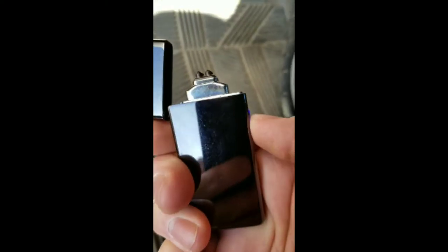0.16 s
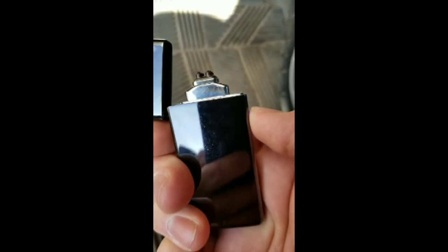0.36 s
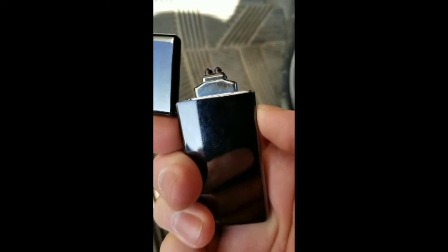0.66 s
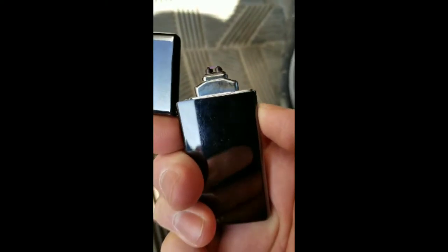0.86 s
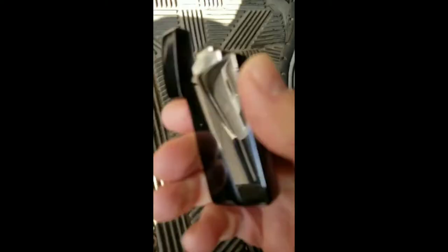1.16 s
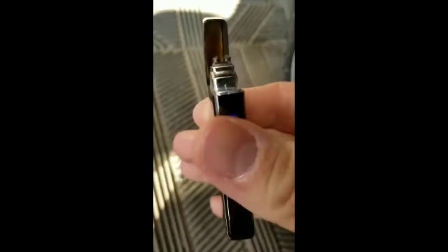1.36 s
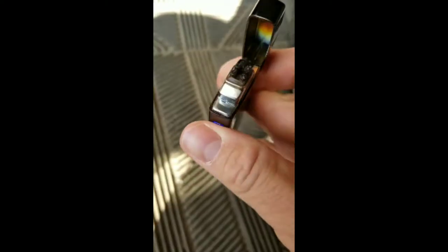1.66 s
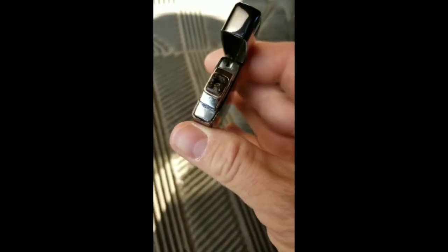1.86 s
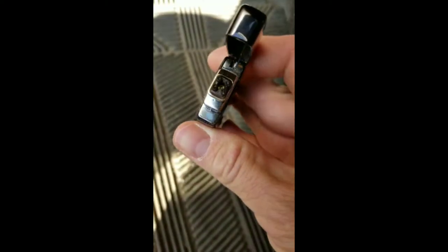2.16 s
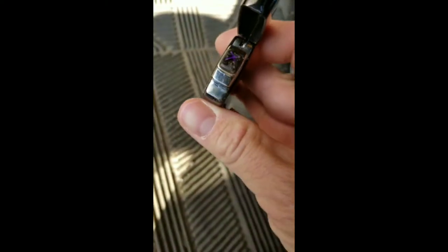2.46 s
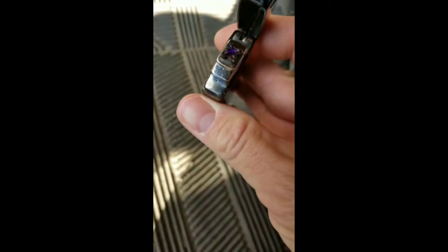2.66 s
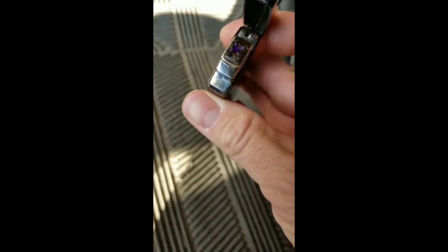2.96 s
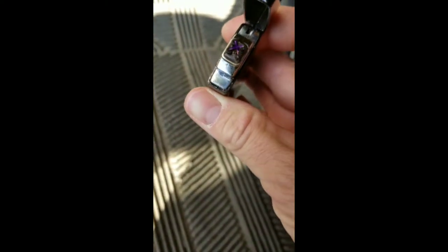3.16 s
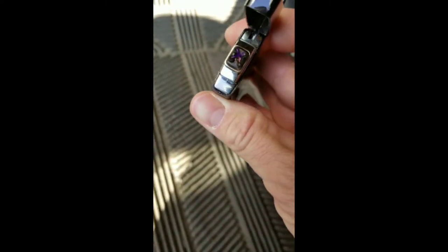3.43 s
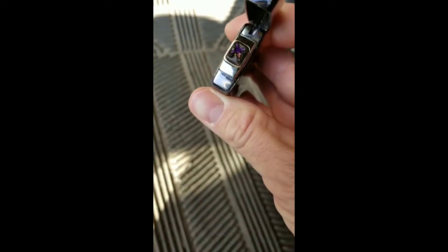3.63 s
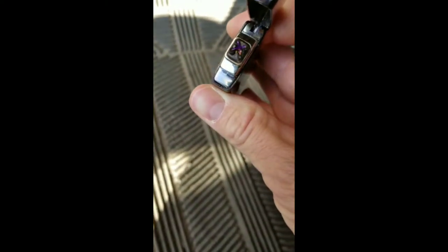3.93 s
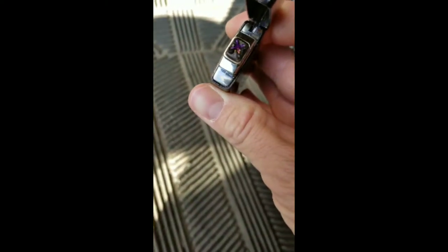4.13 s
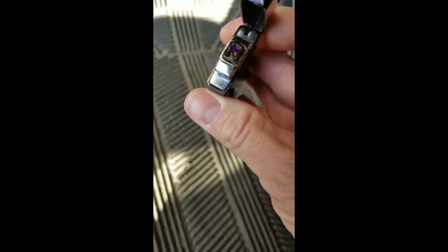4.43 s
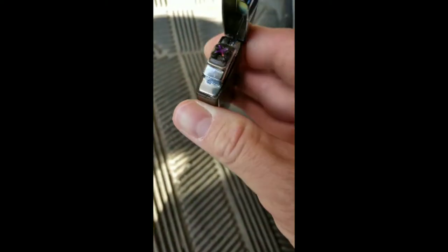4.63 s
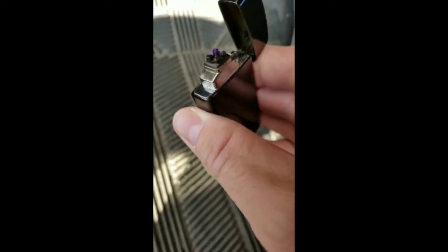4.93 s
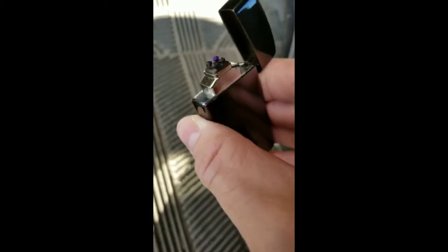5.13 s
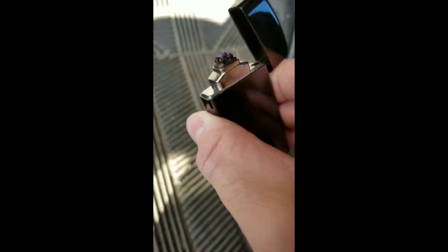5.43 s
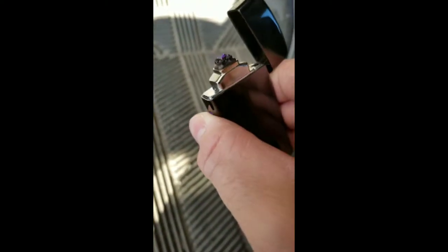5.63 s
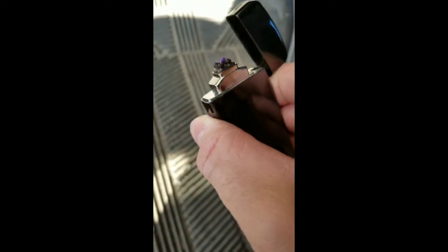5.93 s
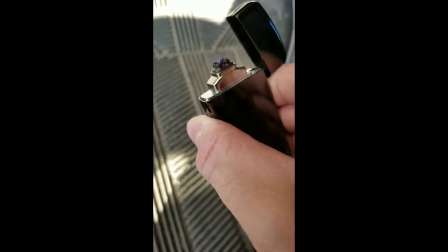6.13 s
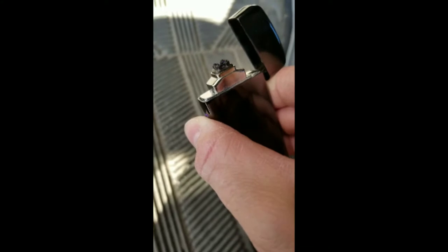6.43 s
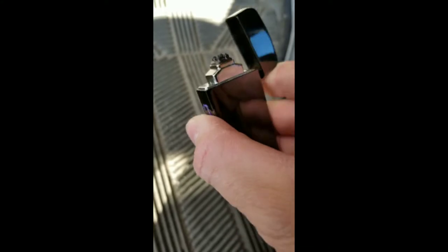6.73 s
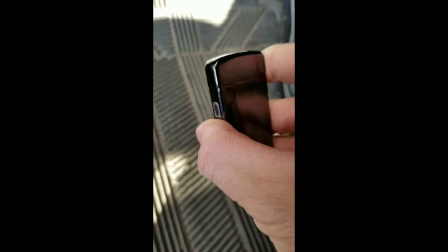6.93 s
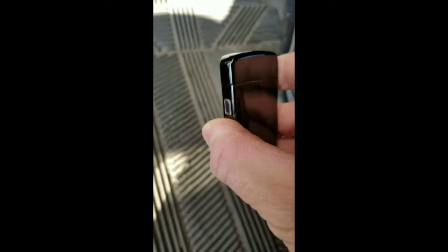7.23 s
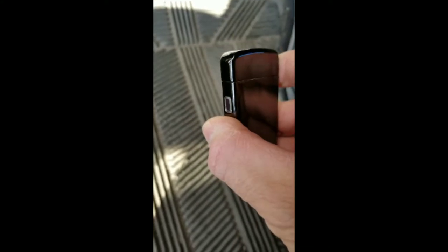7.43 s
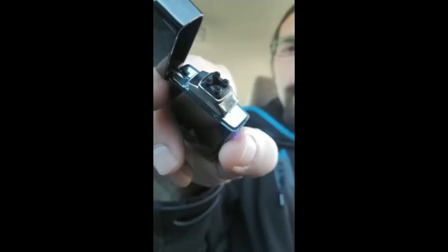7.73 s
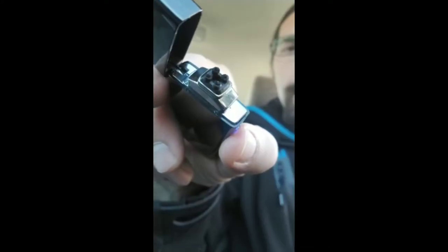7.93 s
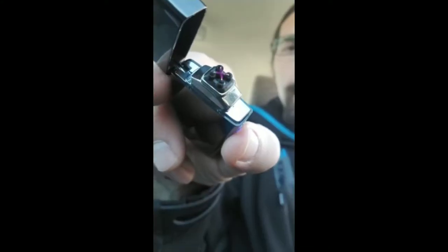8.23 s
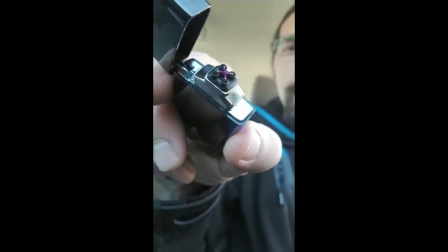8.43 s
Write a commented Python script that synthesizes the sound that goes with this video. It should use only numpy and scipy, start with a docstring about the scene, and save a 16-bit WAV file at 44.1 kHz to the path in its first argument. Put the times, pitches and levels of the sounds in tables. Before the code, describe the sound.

An electric arc lighter snaps and hisses in bright fizzing bursts inside an idling car; its metal lid clacks shut, then another burn starts after silence.

```python
"""An electric arc lighter is fired three times, close to a phone, in a parked car with the engine idling.
A click of the case precedes each burn, which starts with a snap and hisses as a stream of tiny discharges;
the first two end with a pop and fingers rub the case. The sound starts to fade just before the metal lid
clacks shut, ringing in damped modes, then scrapes on the rim. After a brief silence it comes back, with
the phone turned round and the engine and hiss weaker; the last burn is still hissing at the end."""
import sys
import numpy as np
from scipy import signal
from scipy.fft import rfft, irfft
from scipy.io import wavfile
from scipy.ndimage import uniform_filter1d

SR = 44100
rng = np.random.default_rng(int(sys.argv[2]) if len(sys.argv) > 2 else 0)


def put_to_file(sound):
    """Save the sound as 16-bit audio at rate SR, in the file named by the first command-line argument."""
    columns = np.atleast_2d(sound).T  # one column per channel
    safe = np.clip(columns, -1, 1)
    whole_steps = np.round(safe * 32767)
    wavfile.write(sys.argv[1], SR, whole_steps.astype(np.int16))


N = 378785
T = np.arange(N) / SR
BREAK_S = 7.6  # within the silence: the balance of the sources and the cabin colour switch here


def undb(db):
    """Logarithmic level: decibels to linear amplitude gain."""
    return 10 ** (np.asarray(db) / 20)


def curve(rows):
    """Linear interpolation: each column of a table as a line through time."""
    s, *columns = np.transpose(rows)
    return [np.interp(T, s, c) for c in columns]


def unit(x):
    """Power normalisation: scale so that the mean of the channels has rms 1."""
    return x / np.std(np.atleast_2d(x).mean(axis=0))


def pan(db):
    """Interaural level difference: left and right gains, split evenly in dB."""
    return undb(np.array([[1], [-1]]) * db / 2)


def colour(x, points):
    """Minimum-phase filtering: a causal response whose gain follows (hz, db) points."""
    size = 16384
    hz, db = np.transpose(points)
    bins_hz = np.fft.rfftfreq(size, 1 / SR)
    gain_db = np.interp(np.log(bins_hz + 1), np.log(hz), db)
    # folding the cepstrum onto positive time makes the filter causal
    cepstrum = irfft(np.log(undb(gain_db)))[:size // 2]
    cepstrum[1:] *= 2
    response = irfft(np.exp(rfft(cepstrum, size)))[:size // 2]
    filtered = signal.fftconvolve(np.atleast_2d(x), response[None], axes=1)
    return filtered[:, :x.shape[-1]].reshape(x.shape)


def band(x, hz, width):
    """Simple resonance: a second-order peak of given width in Hz, gain 1 at its centre."""
    return signal.lfilter(*signal.iirpeak(hz, hz / width, fs=SR), x)


def top_cut(x):
    """Band limitation: a steep elliptic low-pass at the top of the audible band."""
    return signal.sosfilt(signal.ellip(12, .2, 80, 15550, fs=SR, output="sos"), x)


def walk(rate):
    """Slow random modulation: levels held 1 / rate s and slewed twice; spread near 1."""
    k = max(int(SR / rate), 1)
    held = np.repeat(rng.standard_normal(N // k + 1), k)
    return 1.3 * uniform_filter1d(uniform_filter1d(held, k), k)[:N]


def ring(t60):
    """Free decay: a quarter second of exponential, falling 60 dB in t60 seconds."""
    return np.exp(-np.log(1000) * T[:SR // 4] / t60)


def burst(t60):
    """Broadband impact: exponentially dying noise, independent at each port."""
    return rng.standard_normal((2, SR // 4)) * ring(t60)


def add(out, s, x, db):
    """Superposition: mix a short sound in at s seconds, its channel mean peaking at the given level."""
    i = int(s * SR)
    scaled = x * undb(db) / np.abs(x.mean(axis=0)).max()
    out[:, i:i + x.shape[1]] += scaled[:, :N - i]


def engine(wander=0.0091, uneven=.07, later_db=-7):
    """Harmonic series: the idle drones at multiples of the firing rate; higher ones waver more."""
    # harmonics of the idle: multiple, level_db (rms before the break)
    harmonics = [(1, -48.5), (2, -52), (3, -48.5), (4, -51), (5, -51), (6, -61.5), (9, -57), (10, -69)]
    idle_hz = 24.18  # mean firings per second
    turns = np.cumsum(idle_hz * (1 + wander * walk(2))) / SR
    drone = 0
    for multiple, db in harmonics:
        waver = 1 + min(uneven * multiple, .6) * walk(12)
        drone = drone + undb(db) * waver * np.sin(2 * np.pi * (multiple * turns + rng.random()))
    return np.sqrt(2) * drone * undb(later_db * (T > BREAK_S))


def cabin(spectrum, db, swell_db=0.9):
    """Room resonance: rumble and moving air lifted by cabin modes; the bass is alike at both ports."""
    # difference between the ports: hz, side_minus_mid_db
    side_colour = [(60, -15.5), (130, -20.5), (260, -10.5), (500, -5), (1100, -1), (2500, -1), (12000, -1)]
    # resonances of the cabin: centre_hz, width_hz, lift_db
    resonances = [(111, 20, 4), (465.6, 45, 4.5), (516, 28, 3), (622, 24, 2)]
    mid, side = rng.standard_normal((2, N))
    air = colour(mid + np.array([[1], [-1]]) * colour(side, side_colour), spectrum)
    air = air + sum((undb(lift_db) - 1) * band(air, hz, width) for hz, width, lift_db in resonances)
    boom = band(air, 100, 120)
    swell = undb(swell_db * walk(7.8)) - 1
    return unit(air + boom * swell) * undb(db)


def strokes():
    """Contact pressure: each stroke rises, holds and dies away over the resting grip."""
    # strokes of skin on the case: start_s, length_s, level_db (relative)
    rubs = [(1.108, 0.13, -57.5), (1.27, 0.24, -66.5), (1.453, 0.38, -67), (6.244, .03, -61),
            (7.003, 0.029, -50.5), (7.123, 0.45, -60)]
    attack_s, release_s = 0.04, 0.054
    pressure = undb(-77.5)  # the holding hand never quite rests
    for s, length, db in rubs:
        attack = np.clip((T - s) / attack_s, 0, 1)
        release = np.exp(-np.maximum(T - s - length, 0) / release_s)
        pressure = np.hypot(pressure, undb(db) * attack * release)
    return pressure


def fingers(grain_db=1.0, catch_db=0.9, later_db=-6):
    """Stick-slip friction: skin slides over the polished case in fine grains, catching unevenly."""
    # colour of the rubbing: hz, gain_db
    rub_colour = [(800, -5.5), (2000, 3), (3300, 3.5), (4300, -3), (6000, -1), (8000, -3), (11000, -1.5),
                  (15000, -5)]
    grains = rng.standard_normal((2, N)) * undb(grain_db * walk(300) + catch_db * walk(25))
    return unit(colour(grains, rub_colour)) * strokes() * undb(later_db * (T > BREAK_S))


def ticks(width_hz=600):
    """Impact excitation: a click of button or case is a dry crack and one damped resonance."""
    # clicks: start_s, peak_db (before the fade), ring_hz, t60_s, left_minus_right_db, crack_gain_db
    clicks = [(.4148, -32.5, 4400, .026, 0, -13), (2.476, -53.5, 3000, .04, 0, -6),
              (7.1572, -24.5, 13000, .003, 14, -4), (8.072, -48.5, 5000, .06, 0, -16)]
    out = np.zeros((2, N))
    for s, db, hz, t60, pan_db, crack_db in clicks:
        crack = signal.lfilter(*signal.butter(1, hz, fs=SR), burst(t60 / 2))
        resonance = band(burst(t60), hz, width_hz)
        add(out, s, (resonance + undb(crack_db) * crack) * pan(pan_db), db)
    return out


def spits(per_second=35, lift=0.59, t60=0.0044):
    """Arc instability: now and then the plasma thread jumps and the discharges flare for a moment."""
    jumps = (rng.random(N) < per_second / SR) * rng.exponential(size=N)
    return 1 + lift * signal.fftconvolve(np.minimum(jumps, 2), ring(t60))[:N]


def scatter(t60, evenness=0.032):
    """Multipath scattering: very short reflections smear a click, its overall colour nearly kept."""
    paths = rfft(rng.standard_normal(SR // 4) * ring(t60))
    power = np.abs(paths) ** 2
    whitened = irfft(paths / np.sqrt(power + evenness * power.mean()))
    lead = 64  # samples kept ahead of the main arrival
    return np.roll(whitened, lead)[:SR // 40]


def at_ports(x, t60=(.003, .022), shifting_db=(-14, -1), shifts_per_s=24, lag_s=.0004, count=8):
    """Direct and reflected paths: the left port hears the arc almost directly, the right off hand and lid."""
    def heard(smear):
        return signal.fftconvolve(x, scatter(smear))[:N]

    # the wandering thread keeps changing some paths
    def shifting():
        return unit(sum(walk(shifts_per_s) * heard(t60[1]) for _ in range(count)))

    left, right = (unit(unit(heard(smear)) + undb(db) * shifting()) for smear, db in zip(t60, shifting_db))
    return left, np.roll(right, int(lag_s * SR))


def arc(per_second=6000, scatter_db=2.5, flutter_db=0.86, waver_db=1.44, surge_db=0.63, hiss_db=7.0, later_db=-2.5):
    """Shot noise: thousands of tiny discharges a second from a fluttering, surging plasma thread."""
    # burns: on_s, off_s
    burns = [(.4515, 1.108), (2.514, 6.265), (8.107, 8.7)]
    # course of the hiss, one list per burn: time_s, level_db (relative)
    hiss_level = [
        [(.45, -47), (1.11, -48)],
        [(2.53, -44.5), (2.61, -44), (2.85, -44.8), (3.02, -47), (3.64, -45.5), (3.88, -47), (4.03, -43),
         (4.28, -47), (4.48, -43.5), (4.96, -50), (5.15, -47), (5.3, -50), (5.62, -48.5), (5.78, -43.5),
         (6.05, -48.5), (6.25, -47)],
        [(8.12, -44.5), (8.58, -45.5)],
    ]
    # way of holding the lighter: time_s, then shares of broadside, end_on, oblique, raised
    pose = [(1.2, 1, 0, 0, 0), (1.6, 0, 1, 0, 0), (4.55, 0, 1, 0, 0), (5.0, 0, 0, 1, 0), (7.5, 0, 0, 1, 0),
            (7.7, 0, 0, 0, 1)]
    # hiss colour for each pose; lid and hand shade the right port: hz, left_db, right_db (relative)
    broadside = [(600, -42, -34), (1400, -38, -30), (2200, -29, -31), (3000, -27, -21.5),
                 (3970, -18.5, -17), (4560, -34, -33), (5200, -25, -29), (5850, -19.5, -23),
                 (7060, -22.5, -23.5), (8000, -22.5, -23), (9000, -19.5, -21), (9850, -13, -25),
                 (10500, -23, -24), (11200, -14, -25), (12900, -12, -21), (13800, -5.5, -18),
                 (14800, -11, -15), (15420, 1, -14)]
    end_on = [(600, -32, -31.5), (1400, -30.5, -29), (2240, -24.5, -28), (3170, -27, -23.5),
              (4070, -20, -21), (4680, -40.5, -37), (4930, -24.5, -20), (4980, -29, -32.5),
              (5360, -23, -23), (7300, -21.5, -24.5), (8300, -21.5, -23.5), (8950, -16, -22.5),
              (10200, -17.5, -22), (10900, -14.5, -23), (13460, -15, -16), (14560, 0.5, -18),
              (15350, 2, -8)]
    oblique = [(600, -36.5, -37), (1399.9, -31.5, -32), (2150, -27, -31), (3080, -20, -18.5),
               (4070, -17.5, -19.5), (4550, -27.5, -28), (5250, -31, -33), (5697, -24, -22.5),
               (7100, -22.5, -26.5), (8200, -19, -20), (8540, -22.5, -20.5), (9100, -13.5, -22.5),
               (10200, -18, -24), (11330, -10.5, -23), (12240, -16.5, -22), (13200, -3.5, -16),
               (14000, -11.5, -19), (15270, 0, -16)]
    raised = [(600, -42, -42), (1200, -35, -36), (1900, -31, -30), (2630, -25.5, -40), (3630, -19.5, -21.5),
              (4400, -22.5, -27), (5000, -30, -35), (5460, -20, -30), (6900, -22, -32), (9200, -14.5, -27),
              (10800, -13, -26), (12200, -12, -20), (13700, -7, -19), (14300, -3.5, -15), (15200, -0.5, -9)]
    lit = sum((T >= on) & (T < off) for on, off in burns)
    sparks = (rng.random(N) < per_second / SR) * undb(scatter_db * rng.standard_normal(N))
    unrest_db = flutter_db * walk(1100) + waver_db * walk(40) + surge_db * walk(11)
    sparks = (sparks - sparks.mean()) * undb(unrest_db)
    left, right = at_ports(top_cut(sparks * spits() * lit))
    out = 0
    for share, table in zip(curve(pose), map(np.array, (broadside, end_on, oblique, raised))):
        hiss = np.array([colour(left, table[:, :2]), colour(right, table[:, ::2])])
        out = out + share * hiss / hiss.std()
    level_db = hiss_db + later_db * (T > BREAK_S) + curve(np.vstack(hiss_level))[0]
    return out * np.sqrt(lit.mean()) * undb(level_db)  # the root undoes the silences' share of the rms


def snaps(thump_pan_db=30):
    """Dielectric breakdown: the arc cracks as it strikes or breaks; the surge thumps the microphone."""
    # strikes and breaks: start_s, peak_db, t60_s, left_minus_right_db, thump_peak_db (before the fade)
    breakdowns = [(.452, -17, .02, 8, -32), (1.1045, -23.5, .014, 5, -60), (2.5121, -15.5, .009, 7, -55),
                  (6.2605, -21.5, .012, 6, -60), (8.109, -14.5, .003, 8, -15.5),
                  (8.1132, -27, .006, 7, -65)]
    # colour of the crack: hz, gain_db
    snap_colour = [(300, -3), (1500, -15.5), (3500, -10.5), (5400, -15), (7000, -14), (11000, -3),
                   (15000, 2)]
    out = np.zeros((2, N))
    kick = -band(signal.unit_impulse(SR // 4), 90, 125)
    kick = signal.lfilter(*signal.butter(1, 1700, fs=SR), kick)
    for s, db, t60, pan_db, thump_db in breakdowns:
        add(out, s, colour(burst(t60), snap_colour) * pan(pan_db), db)
        add(out, s, kick * pan(thump_pan_db), thump_db)
    return out


def lid(crack_t60=0.008, tail_t60=0.066, tail_db=-11, modes_db=-18, knock_db=-32, knock_hz=650, pan_db=1.0):
    """Modal vibration: each lid contact cracks and rings the hand-damped case; the first also knocks."""
    # the lid hits the case and chatters: start_s, peak_db (before the fade)
    contacts = [(6.9657, -4.5), (6.9663, -3.5), (6.9678, -9), (6.9697, -15), (6.9757, -23), (6.9845, -32)]
    # modes of the case: hz, level_db (relative), t60_s
    modes = [(2930, -13, .03), (3150, -11, .035), (3750, -9, 0.05), (4280, -8, .045), (4770, -8, 0.055),
             (5570, -9.5, .035), (5820, -3, .03), (8200, -6, 0.04), (8750, -3, .036), (9650, -8, 0.032),
             (10640, -4.5, .042), (11150, -4, 0.039), (11600, 1.5, 0.043), (12130, -0.5, 0.05)]
    # colour of the crack: hz, gain_db
    crack_colour = [(150, 2), (450, -2), (750, -5.5), (1090, -3.5), (1600, -17), (2200, -12), (3100, -3.5),
                    (5700, -3), (6800, -7.5), (8700, -3.5), (11400, -2), (15500, 1), (17000, -15.5)]
    out = np.zeros((2, N))
    treble = signal.butter(2, 2200, "high", fs=SR, output="sos")
    for s, db in contacts:
        rattle = signal.sosfilt(treble, burst(tail_t60))  # only the treble lingers
        crack = colour(burst(crack_t60) + undb(tail_db) * rattle, crack_colour)
        case = 0
        for hz, mode_db, t60 in modes:
            vibration = np.sin(2 * np.pi * (hz * T[:SR // 4] + rng.random((2, 1))))
            case = case + undb(mode_db) * ring(t60) * vibration
        add(out, s, (crack + undb(modes_db) * case) * pan(pan_db), db)
    knock_band = signal.butter(2, (150, knock_hz), "band", fs=SR, output="sos")
    knock = signal.sosfilt(knock_band, signal.unit_impulse(SR // 4))
    add(out, contacts[0][0], np.array([knock, knock]), knock_db)
    return out


def scrape(hz=3500, width_hz=1100, grain_db=3, attack_s=.012, release_s=.03):
    """Dry friction: the shut lid grinds briefly on the rim as a finger presses it home."""
    # one scrape: start_s, length_s, level_db (before the fade)
    s, length, db = (7.032, 0.022, -53)
    grains = rng.standard_normal((2, N)) * undb(grain_db * walk(400))
    pressure = np.clip((T - s) / attack_s, 0, 1) * np.exp(-np.maximum(T - s - length, 0) / release_s)
    return unit(band(grains, hz, width_hz)) * pressure * undb(db)


def fade():
    """Exponential gain laws: holds, sinks evenly in dB, drops to silence and comes back quickly."""
    opening_db, fade_start_s, fade_db_per_s = -2, 6.81, 48
    mute_s, return_s, return_rise_s = 7.56, 7.635, 0.034
    leaving = undb(opening_db - fade_db_per_s * np.maximum(T - fade_start_s, 0)) * (T < mute_s)
    returning = 1 - np.exp(-np.maximum(T - return_s, 0) / return_rise_s)
    return leaving + returning


def scene():
    """Superposition and time delay: lighter and hand over the car, which reaches the left port first."""
    # spectrum of rumble and ventilation before and after the break: hz, level_db (relative)
    spectrum_before = [(20, -17), (45, -8.5), (85, 0.5), (130, -1.5), (175, -7), (300, -13.5), (390, -19),
                       (490, -16), (790, -19.5), (1000, -29), (1300, -30), (2000, -42), (4000, -48),
                       (7500, -53), (15000, -51.5)]
    spectrum_after = [(20, -12), (45, -2.5), (85, 3.5), (130, -4), (200, -13.5), (300, -16), (440, -13.5),
                      (550, -19), (720, -21), (1000, -29), (1450, -41), (3000, -51), (7000, -56),
                      (15000, -53)]
    before, after = cabin(spectrum_before, -40.8), cabin(spectrum_after, -46.5)  # dB rms
    left, right = engine() + np.where(T < BREAK_S, before, after)
    car = np.array([left, np.roll(right, int(.0003 * SR))]) * pan(.6)
    return arc() + snaps() + ticks() + lid() + scrape() + fingers() + car


def record(dry):
    """Gain and band limitation: the level fades away and returns; the top is cut steeply."""
    return top_cut(dry * fade())


dry = scene()
out = record(dry)
put_to_file(out)
```